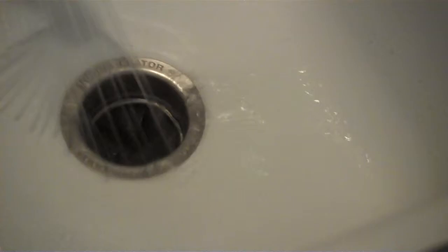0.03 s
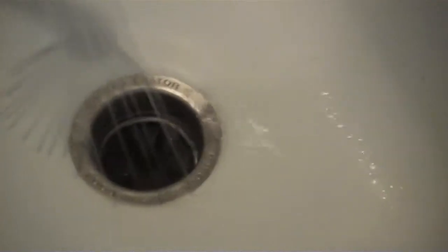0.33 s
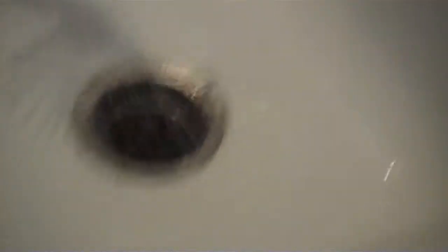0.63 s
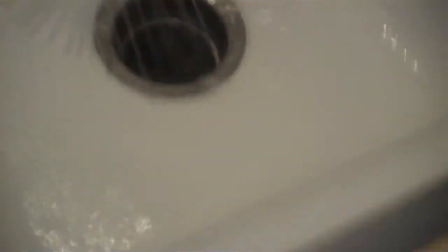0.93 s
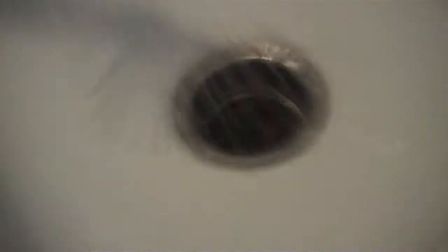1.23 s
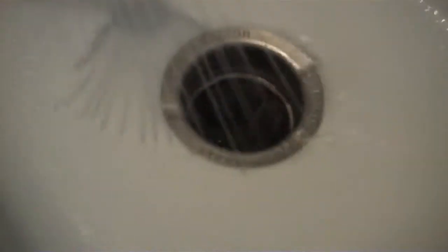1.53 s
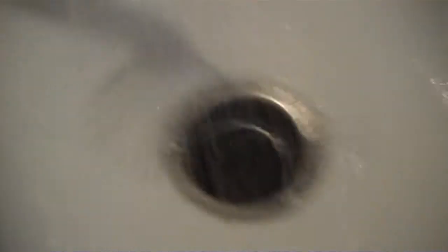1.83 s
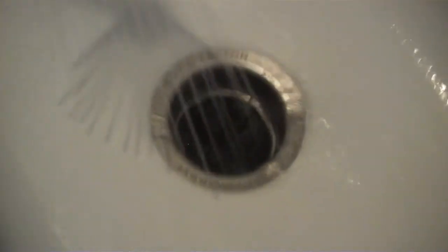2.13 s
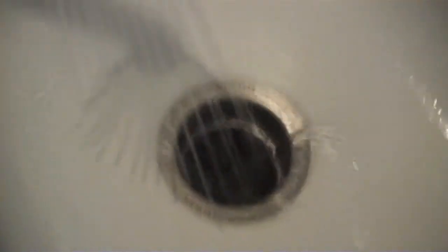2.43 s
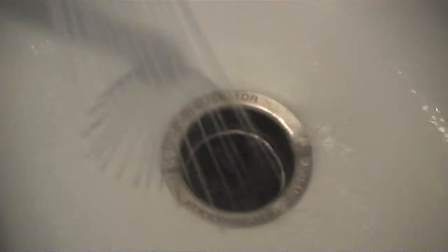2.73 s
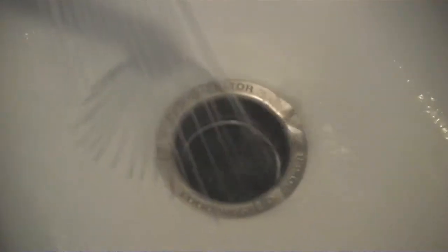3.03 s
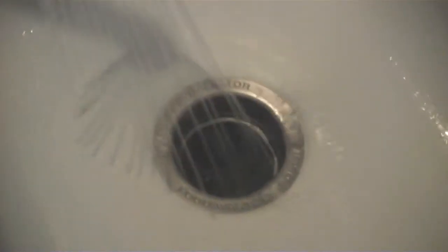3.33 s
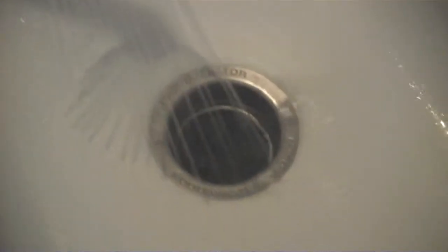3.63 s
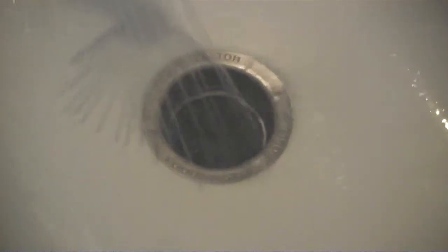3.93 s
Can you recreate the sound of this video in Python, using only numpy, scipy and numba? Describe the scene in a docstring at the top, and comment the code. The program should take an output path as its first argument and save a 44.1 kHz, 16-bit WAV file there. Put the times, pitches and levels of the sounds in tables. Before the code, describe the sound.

Running water patters and gurgles down a sink drain before a waste disposer hums on.

```python
"""Tap spray patters on a kitchen sink, close to a handheld camera, and runs down a waste disposer.
Trapped air gurgles in the drain; falling water rings the grinding chamber and, briefly, the steel flange.
Near 3 s the disposer starts: the motor hums, and its plate slaps into the pooled water
and churns it against the chamber wall."""
import sys
import numpy as np
from scipy import signal
from scipy.fft import rfft, irfft
from scipy.io import wavfile
from numba import njit

SR = 44100
rng = np.random.default_rng(int(sys.argv[2]) if len(sys.argv) > 2 else 0)


def output_pcm(signal):
    """Save a mono or channel-first signal as 16-bit PCM at the path in sys.argv[1].

    Samples are clipped to [-1, 1] before scaling.
    """
    pcm = np.clip(np.atleast_2d(signal).T, -1, 1) * 32767
    wavfile.write(sys.argv[1], SR, np.round(pcm).astype(np.int16))


N = 176400

# Table levels are relative: each layer has its own trim.
# spray on the basin: t/s, level/dB
SPRAY_LEVEL = [(0, -32.5), (.22, -29), (.3, -33.5), (1.05, -31.5), (1.5, -32.5), (2.15, -31.5),
               (2.7, -32.5), (3.18, -31), (3.24, -38), (3.5, -40), (4, -34.5)]
# droplet size classes: f/Hz, width/Hz, level/dB, spread of strengths/dB
DROPLET_BANDS = [(965, 3200, -19, 9), (3320, 2130, -9.5, 4), (6630, 12000, -5.5, 8), (11730, 25800, -4, 26)]
# drumming of the basin: f/Hz, level/dB
BASIN_SPECTRUM = [(25, -23), (90, -21), (128, 13.5), (175, -4.5), (300, 13.5), (420, -19), (1500, -53)]
# resonance of the drain's air cavity: t/s, f/Hz
THROAT_PITCH = [(0, 594), (.3, 571), (.8, 584), (1.05, 566), (1.23, 585), (1.37, 514), (1.6, 605),
                (1.93, 551), (2.24, 582), (2.37, 488), (2.5, 567), (3.0, 615)]
# gurgle of that cavity: t/s, level/dB
THROAT_LEVEL = [(0, -25), (.7, -27), (1.4, -24), (1.46, -32), (1.55, -23), (1.75, -29.5), (1.88, -25),
                (2.3, -28), (2.75, -30), (3.1, -26), (3.5, -39), (4, -46)]
# big gulps of the drain: t/s, level/dB
GULPS = [(.088, -7), (.39, -7), (.555, -6.5), (.648, -15), (.744, -9.5), (.803, -5.5), (.858, -15),
         (.912, -19), (1.02, -6.5), (1.088, -23), (1.191, -6.5), (1.25, -15), (1.368, -7.5), (1.418, -11.5)]
# modes of the grinding chamber: f/Hz, width/Hz, level/dB
CHAMBER_MODES = [(476.5, 10, -0.5), (566.4, 14, -2.5), (702, 38, -8), (784, 215, -3.5), (1035.7, 12.5, 3.5),
                 (1124, 46, -0.5), (1335, 93, -0.5), (1428, 18, 2.5), (1689, 54, -4), (1817, 45, -7)]
# water falling into the chamber: t/s, level/dB
POUR_LEVEL = [(0, -24.5), (.3, -28), (.8, -27.5), (1.05, -24), (1.55, -23), (1.73, -28), (1.9, -22.5),
              (2.15, -24.5), (2.27, -28.5), (2.5, -25.5), (2.85, -25), (3.2, -23), (3.25, -30.5),
              (3.42, -26)]
# single fat drops: t/s, level/dB, left minus right/dB
FAT_DROPS = [(0.164, -8, 7), (0.205, -8, 4.0), (0.2862, -1.5, -4), (0.401, -6.5, 4), (0.7012, -10.5, 13),
             (1.376, -4, -11), (1.433, -0.5, -3), (1.708, -6, 3), (1.831, -5, -4), (1.841, -7, -5),
             (1.9294, 4, -6.5), (1.969, -15, 7), (2.1782, -6, 4.5), (2.1987, 2, -13), (2.2048, 1.5, -5),
             (2.268, -15, 3), (2.4336, -8, 10), (2.4412, -2.5, -5)]
# soft bumps of a hand on the camera: t/s, level/dB
CAMERA_BUMPS = [(0.206, -28), (1.375, -35), (1.927, -25)]
# modes of the steel flange: f/Hz, level/dB
FLANGE_MODES = [(3140, -12), (4650, 0), (6150, 5)]
# harmonics of the motor hum, fundamental first: level/dB
HUM_HARMONICS = [-22.5, -38, -52, -42]
# churning water: t/s, rumble level/dB, swish level/dB
CHURN_LEVEL = [(2.94, -52, -74), (3.12, -29.5, -50), (3.2, -18.5, -15.5), (3.27, -25, -25.5),
               (3.4, -18, -27.5), (3.55, -21.5, -17), (3.78, -21.5, -16.5), (3.83, -24, -15.5),
               (3.92, -16.5, -12.5), (4, -23.5, -33)]
# rumble in the housing: f/Hz, level/dB
RUMBLE_SPECTRUM = [(40, -42), (80, -10), (150, -5.5), (235, 1), (290, 2), (325, 4), (375, -14), (480, -5),
                   (700, -24), (1500, -14.5), (4000, -47)]
# swish on the chamber wall: f/Hz, level/dB
SWISH_SPECTRUM = [(300, -19), (1400, 5), (2700, -1.5), (3500, 2.5), (5000, -2.5), (7000, -3), (10000, -26),
                  (14000, -55)]
# ring of the whirling water before it rises: f/Hz, level/dB
WHIRL_MODES = [(1750, 4), (2060, -7)]
# slaps of the plate on the water: t/s, rise/s, level/dB, f/Hz, width/Hz
PLATE_SLAPS = [(3.145, 0.02, -11, 644, 199), (3.168, 0.002, -1, 746, 1000), (3.178, 0.003, -3, 750, 1500),
               (3.193, 0.0015, 4.5, 604, 646), (3.201, 0.0011, 4.5, 2400, 5950),
               (3.212, 0.0034, -6, 2500, 5970), (3.32, 0.01, -7, 1260, 2400),
               (3.34, 0.0054, -5.5, 1190, 1070), (3.662, 0.013, -10, 1220, 2030),
               (3.775, 0.0064, -12.5, 1400, 1490), (3.772, 0.0058, -10.5, 6260, 4000),
               (3.917, 0.013, -13, 6700, 3500)]
# heavy lurches of the water: t/s, level/dB, f/Hz
LURCHES = [(3.365, -17, 416), (3.398, -12.5, 344), (3.491, -16.5, 340), (3.572, -11.5, 320),
           (3.604, -15, 312), (3.846, -11.5, 265), (3.936, -12, 269)]
# EQ of the left and right microphone ports: f/Hz, level/dB
LEFT_PORT_EQ = [(50, -10.5), (550, 0.53), (2500, -2.5), (4500, -1), (6000, 3.5), (6800, 8), (7500, 14.5),
                (8300, 7.5), (9500, 2), (12000, -1.5)]
RIGHT_PORT_EQ = [(50, -6), (550, 3), (2500, -2.5), (4500, 2), (5300, 5.5), (6000, 10.5), (6800, 5.5),
                 (8000, -1.5), (9500, -5.5), (12000, -13), (14000, -18)]

MOTOR_ON_S, SPIN_UP_S, SHAFT_HZ = 2.938, 0.67, 55


def undb(db):
    return 10 ** (np.asarray(db) / 20)


def unit(x):
    return x / np.sqrt(np.mean(x ** 2) + 1e-18)


def curve(rows, column=1):
    """One column of a table, joined by straight lines in time."""
    rows = np.array(rows)
    return np.interp(np.arange(N) / SR, rows[:, 0], rows[:, column])


def since(start):
    return np.maximum(np.arange(N) / SR - start, 0)


def swell(start, rise_s):
    """An envelope that rises to 1 and dies away."""
    progress = since(start) / rise_s
    return progress * np.exp(1 - progress)


def wander(per_s):
    """Random drift with a spread near 1."""
    knots = rng.standard_normal(4096)
    return np.interp(since(0) * per_s, np.arange(len(knots)), knots)


def colour(x, points, size=4096):
    """Minimum-phase EQ through points of f/Hz, level/dB."""
    hz, db = np.array(points).T
    bin_hz = np.fft.rfftfreq(size, 1 / SR)
    gain = undb(np.interp(np.log(bin_hz + 1), np.log(hz), db))
    cepstrum = irfft(np.log(gain))[:size // 2]
    cepstrum[1:] *= 2
    response = irfft(np.exp(rfft(cepstrum, size)))
    return signal.fftconvolve(x, response)[:N]


@njit
def swept_band(x, hz, width):
    """State-variable band-pass with a moving centre."""
    y, band_state, low_state = np.empty(len(x)), 0., 0.
    for i in range(len(x)):
        tuning, damping = np.tan(np.pi * hz[i] / SR), width / hz[i]
        passed = (band_state + tuning * (x[i] - low_state)) / (1 + tuning * (tuning + damping))
        band_state = 2 * passed - band_state
        low_state += 2 * tuning * passed
        y[i] = damping * passed
    return y


def band(x, hz, width):
    return swept_band(x, hz * np.ones(N), float(width))


def steep_band(x, hz, width):
    return band(band(x, hz, width), hz, width)


@njit
def follow(x, attack_s, release_s):
    """Envelope follower."""
    y, level = np.empty(len(x)), 0.
    for i in range(len(x)):
        level += (x[i] - level) / (SR * (attack_s if x[i] > level else release_s))
        y[i] = level
    return y


def impacts(per_s, spread_db):
    """Random impacts, mostly small, a few large."""
    hit = rng.random(N) < per_s / SR
    size = undb(spread_db * np.minimum(rng.exponential(size=N), 4.1))
    return unit(hit * size * rng.choice([-1, 1], N))


def widen(source, side_db):
    """Two draws of a source as mid and side."""
    return source() + undb(side_db) * source() * np.array([[1], [-1]])


def spray(scatter_s=0.00069, mist_db=0.5, flicker_db=1.62):
    """Droplets burst on the basin over a fine mist and reach the two ports by scattered paths."""
    out = 0
    for hz, width, db, spread_db in DROPLET_BANDS:
        energy = signal.lfilter([1], [1, -np.exp(-2 / (scatter_s * SR))], impacts(2900, spread_db) ** 2)
        patter = np.sqrt(energy / energy.mean() + undb(2 * mist_db)) * undb(1.28 * wander(70))
        burst = lambda: unit(steep_band(patter * rng.standard_normal(N), hz, width))
        out = out + undb(db) * widen(burst, side_db=-5)
    return out * undb(curve(SPRAY_LEVEL) + 8.5 + flicker_db * wander(70))


def basin():
    """The basin drums faintly under the stream."""
    return unit(colour(impacts(2000, spread_db=0), BASIN_SPECTRUM)) * undb(-46.5)


def drain_throat(width_hz=78, throb_db=1.5, glide_per_s=0.34):
    """The stream traps air in the drain: the cavity throbs, and big gulps chirp upward."""
    hz = curve(THROAT_PITCH) * (1 + 0.0097 * wander(25.07))
    push = impacts(2500, spread_db=1) * undb(throb_db * wander(38))
    cavity = band(band(push, hz, width_hz), hz, 2 * width_hz)
    out = unit(cavity) * undb(curve(THROAT_LEVEL))
    for start, db in GULPS:
        age = since(start)
        turns = hz[int(start * SR)] * age * (1 + glide_per_s * age / 2)
        out += undb(db - 9) * swell(start, rise_s=0.0078) * np.sin(2 * np.pi * turns)
    return out


def chamber(x):
    """The grinding chamber rings at its modes."""
    return sum(undb(db) * band(x, hz, width) for hz, width, db in CHAMBER_MODES)


def pour():
    """Falling water rings the chamber; its level ducks briefly after the loud slap."""
    return unit(chamber(impacts(2200, spread_db=1))) * undb(curve(POUR_LEVEL) + 1.5)


def bubbles(count, low_hz, high_hz, decay_cycles, glide, spread_db=3):
    """Small bubbles ring briefly; glide bends their pitch upward."""
    out, age = np.zeros(N + 2048), np.arange(2048) / SR
    for when, pitch, size in rng.random((count, 3)):
        turns = low_hz * (high_hz / low_hz) ** pitch * age
        envelope = undb(-spread_db * np.log(size + 0.053)) * np.exp(-turns / decay_cycles)
        i = int(when * N)
        out[i:i + len(age)] += envelope * np.sin(2 * np.pi * turns * (1 + glide * turns / decay_cycles))
    return unit(out[:N])


def plinks():
    """Bubbles plink in the falling water."""
    ring = bubbles(count=900, low_hz=901.4, high_hz=1999, decay_cycles=26.4, glide=0.0232)
    return ring * undb(curve(POUR_LEVEL) - 4.5)


def fat_drops(decay_s=0.0016):
    """Fat drops land close by with a sharp tick."""
    out, age = np.zeros((2, N)), np.arange(512) / SR
    for start, db, pan_db in FAT_DROPS:
        tick = rng.standard_normal((2, len(age))) * np.exp(-age / decay_s)
        tick /= np.linalg.norm(tick, axis=-1, keepdims=True)
        i = int(start * SR)
        out[:, i:i + len(age)] += tick * undb(db + 15.5 + np.array([[pan_db], [-pan_db]]) / 2)
    return np.array([steep_band(side, hz=7000, width=8100) for side in out])


def camera_bumps():
    """Soft, low bumps of a hand on the camera."""
    hits = sum(undb(db) * swell(start, rise_s=0.002) for start, db in CAMERA_BUMPS)
    return band(hits, hz=55, width=110)


def flange():
    """For a moment the stream plays on the steel flange, and single droplets ping on it."""
    pings = sum(band(impacts(220, spread_db=3), hz, width=130) * undb(db) for hz, db in FLANGE_MODES)
    return unit(pings) * swell(start=0.95, rise_s=0.28) * undb(-32)


def drain_mouth():
    """The stream shifts into the drain's mouth, and its hollow upper resonance slowly swells."""
    note = steep_band(rng.standard_normal(N), hz=1056, width=135)
    return unit(note) * swell(start=1.47, rise_s=0.82) * undb(-29)


def motor(hum_hz=117.4, attack_s=0.012, flutter_db=3.8):
    """Magnetic hum shakes the housing from switch-on; the shaft's drone fades in over the spin-up."""
    age = since(MOTOR_ON_S)
    attack = 1 - np.exp(-age / attack_s)
    spin_up = np.minimum(age / SPIN_UP_S, 1)
    phase = 2 * np.pi * np.cumsum(hum_hz * (1 + 0.0027 * wander(15))) / SR
    hum = sum(undb(db) * np.sqrt(2) * np.sin(k * phase) for k, db in enumerate(HUM_HARMONICS, 1))
    pulses = rng.standard_normal(N) * (1 + np.cos(phase)) ** 2
    buzz = unit(band(band(pulses, hz=280, width=110), hz=240, width=170))
    hum *= attack * undb(-1.5 * spin_up + flutter_db * wander(25))
    turn = 2 * np.pi * SHAFT_HZ * age  # its octave beats against the hum
    shaft = np.sqrt(2) * (np.sin(turn) * spin_up ** 6 + undb(-1) * np.sin(2 * turn) * spin_up)
    return hum + (age > 0) * buzz * undb(-34) + shaft * undb(-31.5)


def churn(rise_per_s=0.14):
    """Whirling water rumbles in the housing and swishes on its wall, the swish throbbing each turn."""
    rumble = unit(colour(impacts(700, spread_db=4), RUMBLE_SPECTRUM)) * undb(curve(CHURN_LEVEL))
    throb = undb(8.2 * wander(29.873) + 1.5 * np.sin(2 * np.pi * SHAFT_HZ * since(0)))
    wall = widen(lambda: unit(colour(impacts(4600, spread_db=3.5) * throb, SWISH_SPECTRUM)), side_db=-3)
    ring = unit(chamber(impacts(2000, spread_db=8.5) * throb)) * undb(-6.5)
    rise = 1 + rise_per_s * since(MOTOR_ON_S + SPIN_UP_S)  # the whirl climbs as the chamber empties
    whirl = sum(undb(db) * band(rng.standard_normal(N) * throb, hz * rise, width=86)
                for hz, db in WHIRL_MODES)
    swish = (wall + ring + unit(whirl) * undb(3)) * undb(curve(CHURN_LEVEL, column=2) - 6)
    return (rumble + swish) * (since(MOTOR_ON_S) > 0)


def sputter():
    """Fine bubbles sputter in the churned water."""
    fizz = lambda: bubbles(count=1300, low_hz=3200, high_hz=6980, decay_cycles=22, glide=0)
    return widen(fizz, side_db=-16) * undb(curve(CHURN_LEVEL, column=2) - 11)


def plate_slaps():
    """The plate hits pooled water: splashes ring the chamber, and the water lurches low."""
    splashes = np.zeros(N)
    for start, rise_s, db, hz, width in PLATE_SLAPS:
        envelope = swell(start, rise_s)
        splash = steep_band(rng.standard_normal(N) * envelope, hz, width)
        splashes += undb(db) * unit(splash) * np.sqrt(np.mean(envelope ** 2))
    out = undb(-12.5) * splashes + undb(-4.5) * chamber(splashes)
    for start, db, hz in LURCHES:
        out += undb(db) * swell(start, rise_s=0.008) * np.sin(2 * np.pi * hz * since(start))
    return out


def scene():
    """A bed of running water, passing accents, then the disposer."""
    bed = spray() + basin() + drain_throat() + pour() + plinks()
    accents = fat_drops() + camera_bumps() + flange() + drain_mouth()
    disposer = motor() + churn() + sputter() + plate_slaps()
    return bed + accents + disposer


def record(dry, threshold_db=-3.5, top_hz=14250):
    """Each port has its own treble resonance; a limiter ducks after loud peaks, and the top is cut."""
    ports = np.array([colour(dry[0], LEFT_PORT_EQ), colour(dry[1], RIGHT_PORT_EQ)])
    level = follow(np.abs(ports).max(axis=0), attack_s=0.0026, release_s=0.27)
    duck = np.minimum(1, undb(threshold_db) / (level + 1e-9))
    limited = np.clip(ports * duck, -1, 1)
    return signal.sosfilt(signal.ellip(10, .2, 70, top_hz, fs=SR, output="sos"), limited)


dry = scene()
out = record(dry)
output_pcm(out)
```